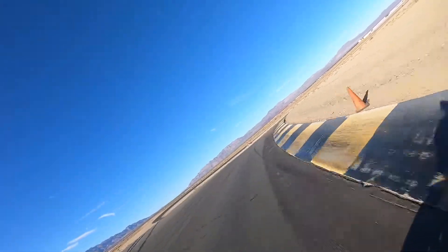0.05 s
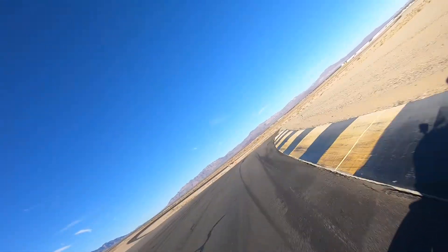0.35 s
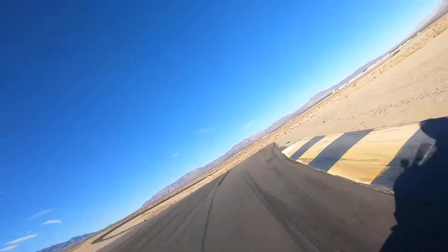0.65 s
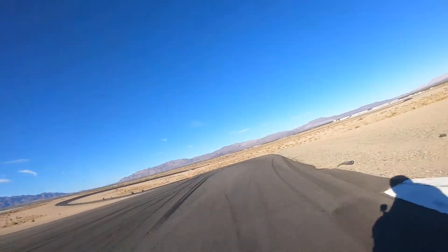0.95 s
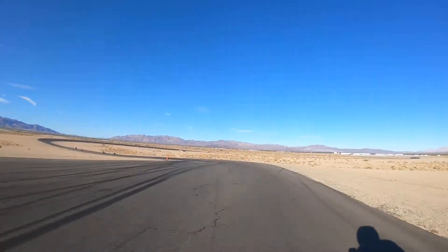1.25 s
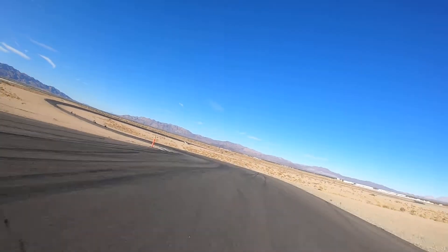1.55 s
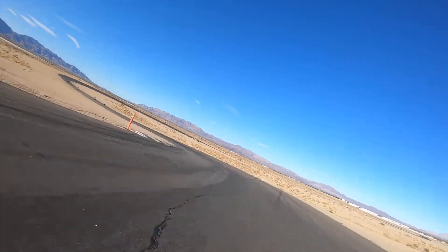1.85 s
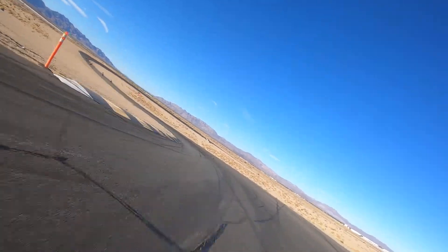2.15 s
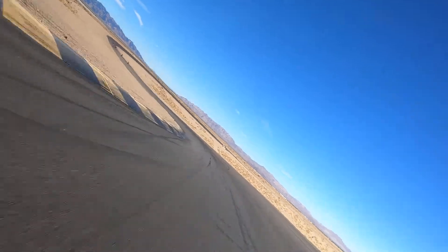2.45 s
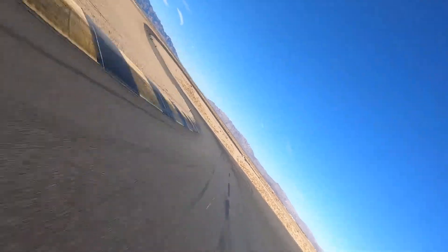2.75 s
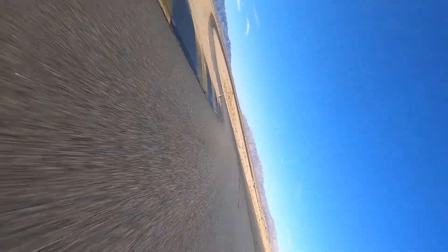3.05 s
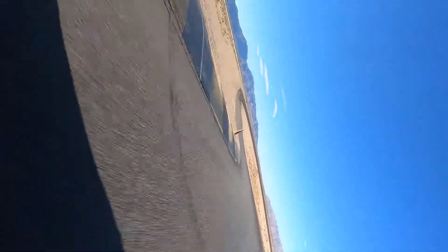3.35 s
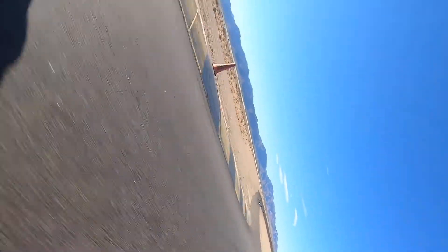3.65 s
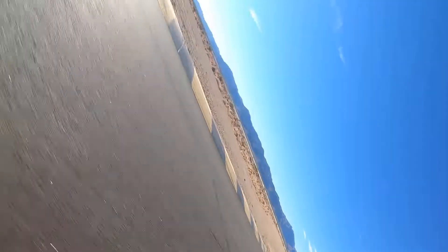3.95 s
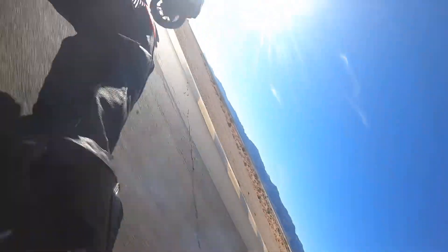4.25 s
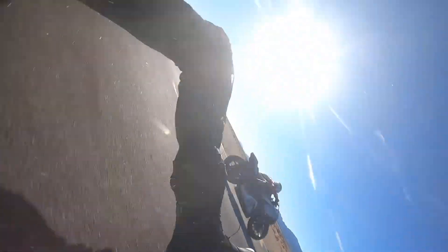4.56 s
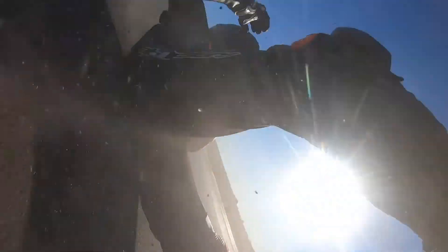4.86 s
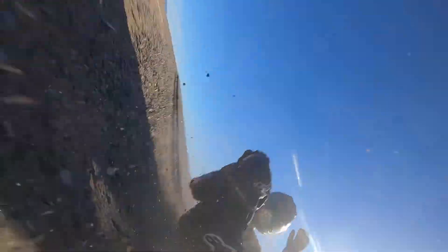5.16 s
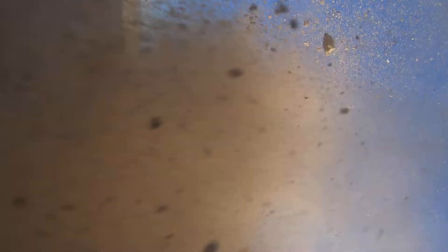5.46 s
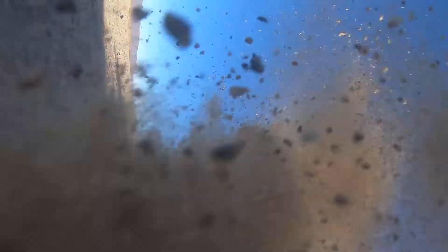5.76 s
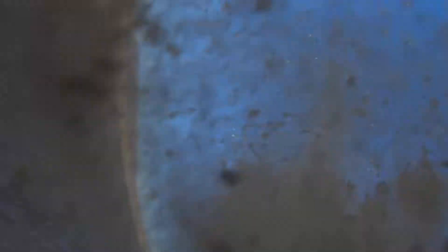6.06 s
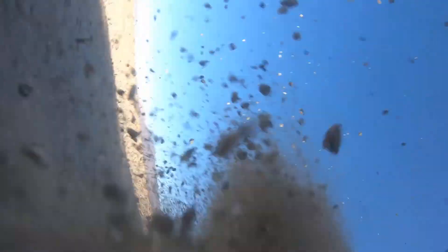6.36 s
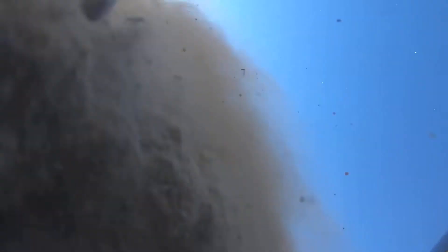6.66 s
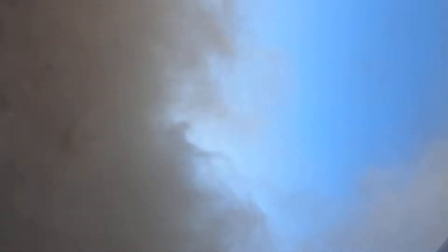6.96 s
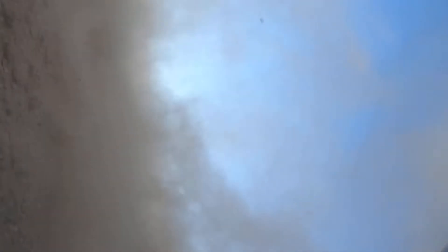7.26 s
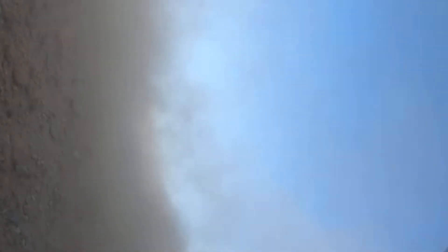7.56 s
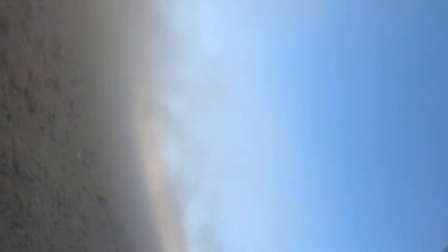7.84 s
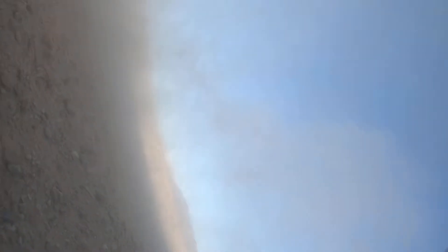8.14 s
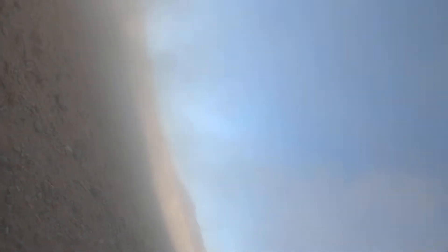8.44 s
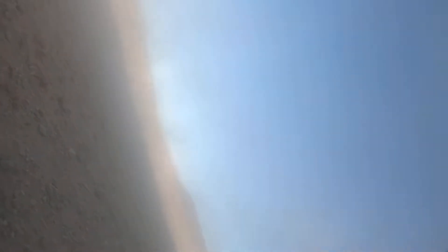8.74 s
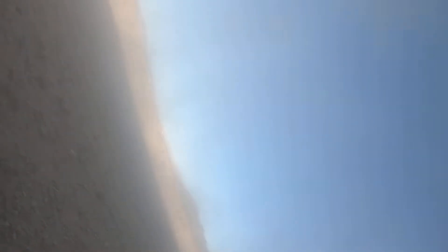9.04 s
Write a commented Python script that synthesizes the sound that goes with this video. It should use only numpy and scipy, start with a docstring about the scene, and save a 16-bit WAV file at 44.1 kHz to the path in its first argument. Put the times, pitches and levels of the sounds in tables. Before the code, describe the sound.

A motorcycle rounds a racetrack bend, heard from a microphone on its body, with a droning exhaust and rumbling wind. The engine revs up as the bike falls, then runs down while metal screeches and plastic grinds along the asphalt. The bike bounces through gravel with crunches, thumps and stones cracking close by, and finally lies idling with a lumpy, rattling beat.

```python
"""A motorcycle, heard from a camera on its body, rounds a bend: the exhaust drones and wind rumbles.
The engine revs up as the tyre lets go, and the bike falls. Metal screeches and plastic grinds along the
asphalt, the bodywork knocks and the frame groans while the engine runs down. Then the bike ploughs and
bounces through gravel, and flying stones crack against the camera housing.
At last it rests on its side and keeps idling with a lumpy, rattling beat."""
import sys
import numpy as np
from scipy import signal
from scipy.fft import irfft
from scipy.io import wavfile
from scipy.ndimage import uniform_filter1d, minimum_filter1d

SR = 44100
rng = np.random.default_rng(int(sys.argv[2]) if len(sys.argv) > 2 else 0)


def transcribe(u):
    """Save the signal u as a 16-bit wav file named by the first command-line argument.

    u: samples, shape (n,) or (channels, n), limited to [-1, 1]; the rate is SR.
    q: integer samples, one column per channel.
    """
    v = np.clip(np.atleast_2d(u).T, -1, 1)
    q = np.round(v * 32767).astype(np.int16)
    wavfile.write(sys.argv[1], SR, q)


N = 405719
T = np.arange(N) / SR

# Levels are relative. An "order" is a tone at a multiple of the engine's speed.
# A "colour" says how strong a sound is from low to high pitch.
# crank turns per second through the bend, the wheelspin and the run-down: t/s, f/Hz
CRANK_SPEED = [(0.1, 54.6), (0.55, 54.6), (0.94, 52.1), (1.26, 51.2), (1.62, 52.1), (2.85, 62.9),
               (2.97, 66.5), (3.1, 65.2), (3.42, 87.3), (3.57, 72.6), (3.86, 61.2), (3.97, 60.5),
               (4.1, 58.0), (4.26, 53.9), (4.51, 45.7), (4.72, 41.4)]
# strong exhaust orders: multiple of the crank speed, level/dB, change with the throttle shut/dB
MAIN_ORDERS = [(2, 1, -3.5), (3, -4.5, -3.5), (4, 1.5, -2)]
# a strong order swells as it crosses a resonance of the exhaust pipe: f/Hz, level/dB
PIPE_COLOUR = [(82, -13), (102, -19), (110, -12), (124, -16), (135, -14), (155, -12.5), (178, -7),
               (206, -10.5), (222, -15.5), (255, -17), (310, -23), (350, -27.5)]
# weak exhaust orders: multiple of the crank speed, level/dB against the mean of the strong ones
WEAK_ORDERS = [(1, -35), (2.5, -22), (5, -21), (6, -17.5), (7, -21), (9, -15), (10, -17.5), (11, -12.5)]
# uneven beats of the four cylinders: place in the engine cycle (0-1), level/dB
CYLINDER_BEATS = [(.9, -1), (.02, -2), (.22, -6), (.43, 0)]
# clatter of gears and valves while riding: t/s, level/dB
CLATTER_LEVEL = [(0, -22), (1.2, -25), (2.85, -22), (3.3, -21.5), (4.3, -20), (5.1, -22.5)]
# colour of that clatter: f/Hz, level/dB
ENGINE_COLOUR = [(252, -29), (420, -14), (680, -10.5), (1000, -3), (1350, 1.5), (2050, 2), (2400, -13.5),
                 (2900, -18.5), (3250, -15.5), (3650, -29), (4000, -22), (5500, -39.5), (8200, -48.5),
                 (11000, -56), (15000, -88.5)]
# ringing of the engine case: f/Hz, width/Hz
CASE_RING = [(3270, 27), (4000, 190)]
# rumble of the wind and the shaking camera mount: f/Hz, level/dB
RUMBLE_COLOUR = [(15, -12.5), (35, -1), (70, -1), (120, -0.5), (220, 1.5), (320, -10), (400, -26.5),
                 (700, -50), (4000, -96.5)]
# bodywork on asphalt: start t/s, length/s, screech level/dB, grinding level/dB
ROAD_SCRAPES = [(3.012, 0.92, -20, -31), (4.212, .82, -24, -28), (4.921, 0.088, -39, -21.5)]
# screech of sliding metal: f/Hz, width/Hz, level/dB
METAL_SCREECH = [(1865, 129, 5), (1717, 200, -3), (3960, 670, -22.5), (8100, 8900, -52.5)]
# grinding of the plastic panels: f/Hz, level/dB
PLASTIC_COLOUR = [(228, -21), (380, -17.5), (600, -15.5), (1000, -2.5), (1900, 1.5), (2400, -26.5),
                  (4200, -30.5), (6000, -52), (9000, -71.5), (15000, -71)]
# ticking of grit and small stones: f/Hz, level/dB
TICK_COLOUR = [(600, -53), (1600, -13), (2700, 2), (3500, 0.5), (5000, -5), (6500, -12), (8000, -10.5),
               (10500, -21), (13000, -28.5), (15500, -38)]
# blows on the frame and panels: t/s, clack level/dB, thud level/dB
BODY_KNOCKS = [(3.135, -18, -6), (5.189, -11.5, -33), (5.242, -22, -10), (5.681, -20, -10.5),
               (5.889, -23, -20), (5.946, -16.5, -39), (6.018, -25, -22), (6.27, -16.5, -8.5),
               (6.395, -23, -30), (6.518, -17, -18), (6.56, -18.5, -10.5), (7.23, -40, -5.5),
               (8.392, -16.5, -8), (8.428, -12, -10)]
# low tones of a thud: f/Hz, level/dB, time to fade by 60 dB/s
THUD_TONES = [(157, -1, 0.095), (226.6, 7, 0.07), (279, -9, 0.089)]
# panels, whether knocked or rattling at idle: f/Hz, level/dB
PANEL_COLOUR = [(240, -31.5), (400, -17.5), (630, -20.5), (770, -2), (950, -14), (1300, 2), (1700, 4.5),
                (2050, -4.5), (2300, -17.5), (2700, -21), (3100, -28), (4800, -36), (5400, -56),
                (8000, -69), (14000, -92)]
# the frame gouges the ground: middle t/s, half length/s, level/dB
FRAME_GOUGES = [(4.544, 0.083, -28.5), (4.716, 0.08, -24), (4.858, 0.029, -28), (5.03, 0.032, -31.5),
                (5.32, 0.067, -26), (5.463, 0.05, -28), (5.757, 0.06, -29)]
# hollow ringing of the frame: f/Hz, width/Hz
FRAME_RING = [(380, 89), (590, 133), (800, 400)]
# engine cycles per second at idle: t/s, f/Hz
IDLE_RATE = [(6.85, 12.9), (6.95, 12.2), (7.25, 12.3), (7.4, 12.6), (8.2, 12.6), (8.35, 12.35),
             (8.9, 12.35), (9.03, 11.9), (9.2, 12.9)]
# exhaust orders at idle: multiple of the cycle rate, level/dB
BOOM_ORDERS = [(3, -14.5), (5, -25.5), (6, -25), (7, -2), (8, -11.5), (11, -16), (12, -15.5), (15, -16.5),
               (16, -13), (24, -22.5), (25, -24)]
# engine metal ringing at idle: f/Hz, width/Hz, level/dB
METAL_RING = [(2660, 180, -22.5), (5820, 360, -48), (7640, 200, -52.5)]
# digs into the gravel between bounces: start t/s, length/s, crunch, thump and spray level/dB
GRAVEL_DIGS = [(4.966, 0.17, -41, -17.5, -64), (5.212, 0.14, -19, -12.5, -34),
               (5.383, 0.086, -23, -13, -28.5), (5.686, 0.15, -21.5, -14.5, -36),
               (6.008, 0.18, -20, -13.5, -43), (6.273, 0.25, -22, -13.5, -41.5),
               (6.569, 0.21, -27, -14.5, -51), (6.803, 0.29, -41, -25.5, -62)]
# stones crunching under the bike: f/Hz, level/dB
GRAVEL_COLOUR = [(250, -20), (420, -8.5), (750, -1.5), (1400, 8.5), (1950, 9), (2400, -12), (3500, -16),
                 (6000, -39.5), (15000, -89.5)]
# the frame thumping through gravel: f/Hz, level/dB
JOLT_COLOUR = [(30, -1.5), (60, -5.5), (90, 3.5), (170, -1), (280, -3.5), (370, -26), (700, -61),
               (4000, -84)]
# the largest stones that hit the camera housing: t/s, level/dB
STONE_HITS = [(5.256, -15.5), (5.285, -20), (5.504, -33), (5.5343, -15), (5.571, -21), (5.62, -27),
              (5.725, -18.5), (5.8492, -21), (5.8648, -20), (6.032, -18), (6.0777, -15), (6.318, -27),
              (6.4, -18.5), (6.483, -32), (6.601, -17), (8.5562, -27), (8.5747, -32)]
# ringing of the camera housing: f/Hz, level/dB, time to fade by 60 dB/s
HOUSING_TONES = [(3330, -18, 0.023), (5180, -15, 0.028), (7450, -20, 0.052)]

FALL_S, OFF_TRACK_S = 2.56, 5.45  # the bike starts to go down; it has left the track
IDLE_FROM_S, IDLE_BLEND_S = 4.95, 0.6  # the falling engine note settles into the idle
DIG_ATTACK_S = 0.036


def amp(db):
    """Turns decibels into a gain to multiply by."""
    return 10 ** (np.asarray(db) / 20)


def unit(x):
    """Scales a signal to an average strength (rms) of 1."""
    return x / np.sqrt(np.mean(x ** 2) + 1e-20)


def curve(rows):
    """Joins (time, value) points with straight lines."""
    return np.interp(T, *np.transpose(rows))


def ramp(start, length):
    """0 before the start, then rising evenly to 1."""
    return np.clip((T - start) / length, 0, 1)


def contact(start, length, attack_s, release_s):
    """A loudness shape that rises, holds at 1 and dies away after its length."""
    return ramp(start, attack_s) * np.exp(-np.maximum(T - start - length, 0) / release_s)


def add(mix, s, sound):
    """Mixes a sound in at time s."""
    part = mix[round(s * SR):][:len(sound)]
    part += sound[:len(part)]


def wander(hz):
    """A smooth random wobble of strength 1, up to about hz."""
    steps = rng.standard_normal(N // 32 + 2)
    smooth = signal.sosfilt(signal.butter(2, hz, fs=SR / 32, output="sos"), steps)
    return unit(np.interp(np.arange(N), np.arange(len(steps)) * 32, smooth))


def grains(per_s, spread_db):
    """Random clicks, mostly small and a few large."""
    size = amp(spread_db * np.minimum(rng.exponential(1, N), 4))
    return unit(size * rng.choice([-1, 1], N) * (rng.random(N) < per_s / SR))


def shaped(x, points, size=4096):
    """Filters a sound to the given colour; white noise keeps its level."""
    hz, db = np.transpose(points)
    bin_hz = abs(np.fft.fftfreq(size, 1 / SR))
    log_gain = np.log(amp(np.interp(np.log(bin_hz + 1), np.log(hz), db)))
    response = np.exp(np.conj(signal.hilbert(log_gain)))  # rings after a hit, never before it
    taps = np.fft.ifft(response).real[:size // 2]
    return signal.oaconvolve(x, taps / np.linalg.norm(taps))[:N]


def colour(x, points):
    """Gives a sound a colour and a strength of 1."""
    return unit(shaped(x, points))


def resonate(x, hz, width):
    """Makes a sound ring around one pitch, at a strength of 1."""
    b, a = signal.iirpeak(hz, hz / width, SR)
    return unit(signal.lfilter(b, a, signal.lfilter(b, a, x)))


def repeating(turns, size=800):
    """A spinning part whirrs because the same roughness comes round on every turn."""
    one_turn = irfft(np.exp(2j * np.pi * rng.random(size // 2 + 1)))
    return unit(np.interp(turns % 1, np.arange(size) / size, one_turn))


def shaking(cycles, ring, between):
    """The loudness shape of a rattle: each cylinder's beat shakes loose a burst."""
    bursts = sum(amp(db) * np.exp(-((cycles - place) % 1) / ring) for place, db in CYLINDER_BEATS)
    return unit(between + uniform_filter1d(bursts, size=130))


def order(k, turns):
    """A tone at k times the crank speed; the pipe delays each differently, smearing pulses into a drone."""
    return np.sqrt(2) * np.sin(2 * np.pi * (k * turns + k ** 2 / 5))


def pipe_db(k, crank_hz, shut_db, null_hz=237, null_width_hz=10):
    """How the pipe's resonances and the throttle change the level of a strong order."""
    hz = k * crank_hz
    shut = ramp(3.55, 0.24)  # the throttle closes
    # under load the firing order, the fourth, cancels itself around one pitch
    null_db = -16 * np.exp(-((hz - null_hz) / null_width_hz) ** 2) * (k == 4)
    drop_db = -8 * ramp(4.73, 0.071)  # the exhaust drone drops quickly at 4.7 s, under the scraping
    return np.interp(hz, *np.transpose(PIPE_COLOUR)) + (1 - shut) * null_db + shut * shut_db + drop_db


def exhaust(crank_hz, turns, waver, upright, muffle_db=14):
    """Pulses of gas leave the pipe as a drone of three strong tones and several weak ones."""
    strong = [(k, amp(db + pipe_db(k, crank_hz, shut_db))) for k, db, shut_db in MAIN_ORDERS]
    drone = sum(gain * order(k, turns) * (1 + waver * wander(28)) for k, gain in strong)
    load = upright * sum(gain for _, gain in strong) / len(strong)
    for k, db in WEAK_ORDERS:
        silencer_db = np.interp(k * crank_hz, [335, 400], [0, muffle_db])  # only low tones get out freely
        drone += load * amp(db - silencer_db) * order(k, turns) * (1 + 2 * waver * wander(11))
    return drone


def clatter(turns, upright, gear_teeth=22):
    """Shafts whirr, valves rattle, the engine case rings and the gear teeth whine."""
    whirr = repeating(turns) + .5 * repeating(turns / 2, size=1600)  # crankshaft and camshafts
    rattle = shaking(turns / 2, ring=.12, between=1) * rng.standard_normal(N)
    drive = upright * whirr + rattle
    case_ring = unit(sum(resonate(drive, hz, width) for hz, width in CASE_RING))
    whine_db = -15 + 5 * ramp(1.8, .3)  # louder as the bike pulls out of the bend
    whine = order(gear_teeth, turns) * amp(whine_db + 2.5 * wander(8))
    tones = upright * (amp(-22) * case_ring + whine)
    return (colour(drive, ENGINE_COLOUR) + tones) * amp(curve(CLATTER_LEVEL))


def riding_engine(exhaust_db=-2):
    """Exhaust and clatter follow the crank speed, then fade as the idle takes over."""
    crank_hz = curve(CRANK_SPEED)
    waver = np.interp(T, [3.2, 3.8], [.1, .28])  # the note breaks up once the bike is scraping
    upright = np.interp(T, [2.9, 3.2], [1, .35])  # the clean tones sink once the bike is down
    turns = np.cumsum(crank_hz * (1 + 0.011 * waver * wander(15))) / SR
    running = ramp(0, 0.005) - ramp(IDLE_FROM_S, IDLE_BLEND_S)
    return running * (amp(exhaust_db) * exhaust(crank_hz, turns, waver, upright) + clatter(turns, upright))


def buffeting(riding_db=-25, sliding_db=-18.5, resting_db=-26.5, dig_db=-4):
    """Wind and the shaking mount make a lumpy rumble, strongest while the bike slides and digs in."""
    stage_db = np.interp(T, [FALL_S, FALL_S + .3, OFF_TRACK_S, OFF_TRACK_S + 0.13],
                         [riding_db, sliding_db, sliding_db, resting_db])
    _, thump, _ = digging()
    level = np.hypot(amp(stage_db), amp(dig_db) * thump)
    return colour(rng.standard_normal(N), RUMBLE_COLOUR) * level * amp(1.7 * wander(28))


def asphalt(ticks_db=-29):
    """The rough road catches on metal and plastic, which chatter as they slide; loose grit ticks."""
    screeching, grinding = sum(np.outer(amp(levels_db), contact(s, length, 0.073, release_s=0.095))
                               for s, length, *levels_db in ROAD_SCRAPES)
    chatter = wander(24)
    catches = grains(per_s=3000, spread_db=2.5)
    screech = unit(sum(amp(db) * resonate(catches, hz, width) for hz, width, db in METAL_SCREECH))
    grind = colour(grains(per_s=3000, spread_db=1), PLASTIC_COLOUR)
    grind += amp(ticks_db) * colour(grains(per_s=400, spread_db=5), TICK_COLOUR)
    return screech * screeching * amp(1.9 * chatter) + grind * grinding * amp(1.7 * chatter)


def knocks(clack_s=0.0038, thud_rise_s=0.01):
    """Blows on the bodywork: a plastic clack over a short low thud."""
    clacks, thuds, t = np.zeros(N), np.zeros(N), T[:SR // 5]
    for s, clack_db, thud_db in BODY_KNOCKS:
        add(clacks, s, amp(clack_db) * t / clack_s * np.exp(1 - t / clack_s))
        thud = sum(amp(db - 60 * t / fade_s) * np.sin(2 * np.pi * hz * rng.uniform(0.865, 1.36) * t)
                   for hz, db, fade_s in THUD_TONES)
        add(thuds, s, amp(thud_db) * thud * (1 - np.exp(-t / thud_rise_s)))
    return shaped(clacks * rng.standard_normal(N), PANEL_COLOUR) + thuds


def gouges():
    """Where the frame digs in hard, it judders with a hollow groan."""
    pressure = sum(amp(db) * np.exp(-((T - s) / half) ** 4) for s, half, db in FRAME_GOUGES)
    judder = rng.standard_normal(N)
    return pressure * unit(sum(resonate(judder, hz, width) for hz, width in FRAME_RING))


def idling_engine(boom_db=-13.5, rattle_db=-24.5, recover_from_s=7.066, recover_s=1):
    """A slow lumpy beat: one exhaust order booms, and the boom rattles the bodywork."""
    cycles = np.cumsum(curve(IDLE_RATE)) / SR
    cycles -= np.interp(7.7, T, cycles)  # a cycle starts at 7.7 s
    # the crash chokes the idle, then it picks up again
    choke_db = -11.5 * np.exp(-np.maximum(T - recover_from_s, 0) / recover_s)
    boom = np.zeros(N)
    for k, db in BOOM_ORDERS:
        # orders far from the booming seventh lag behind it and change most from cycle to cycle
        lag = (k - 7) ** 2 / 4 + 0.2 * abs(k - 7) * wander(4)
        boom += amp(db) * np.cos(2 * np.pi * k * (cycles - .1) - lag)
    shake = shaking(cycles, ring=.1, between=.25) * (1 + np.tanh(boom) ** 2) * rng.standard_normal(N)
    metal = sum(amp(db) * resonate(shake, hz, width) for hz, width, db in METAL_RING)
    rattle = colour(shake, PANEL_COLOUR) + metal
    rattle *= amp(rattle_db + 1.62 * choke_db)  # the rattle grows back faster than the boom
    stumble = amp(np.interp(T, [8.44, 8.455, 8.48, 8.50], [4, -6, -2, 2.5]))  # the engine misses a beat
    running = ramp(IDLE_FROM_S, IDLE_BLEND_S)
    return running * stumble * (np.sqrt(2) * amp(boom_db + choke_db) * boom + rattle)


def digging():
    """Three loudness shapes (crunch, thump, spray) that swell each time the bike digs into the gravel."""
    return sum(np.outer(amp(levels_db), contact(s, length, DIG_ATTACK_S, release_s=0.029))
               for s, length, *levels_db in GRAVEL_DIGS)


def gravel(hail_from_s=5.17, hail_db=-39, fade_db_per_s=5.5, patter_db=9):
    """At each dig, stones crunch, the frame thumps and grit sprays; grit patters down in between."""
    crunch, thump, spray = digging()
    # thrown grit keeps raining on the bike, fading as it slows
    hail = contact(hail_from_s, 1.4, DIG_ATTACK_S, release_s=0.12)
    hail *= amp(hail_db - fade_db_per_s * (T - hail_from_s))
    clumps = wander(38)
    crushed = grains(per_s=4000, spread_db=2.5)
    jolts = grains(per_s=900, spread_db=1.5)
    grit = grains(per_s=1200, spread_db=7) + .6 * rng.standard_normal(N)
    sound = colour(crushed, GRAVEL_COLOUR) * np.hypot(crunch, hail * amp(patter_db)) * amp(3.2 * clumps)
    sound += colour(jolts, JOLT_COLOUR) * thump * amp(clumps)
    return sound + colour(grit, TICK_COLOUR) * np.hypot(spray, hail) * amp(2.5 * clumps)


def stones(level_db=3, crack_s=0.0025):
    """Stones crack against the camera housing and make it ring briefly."""
    cracks, rings, t = np.zeros(N), np.zeros(N), T[:SR // 16]
    for s, stone_db in STONE_HITS:
        add(cracks, s, amp(stone_db) * np.exp(-t / crack_s))
        for hz, db, fade_s in HOUSING_TONES:
            struck_hz = hz * rng.uniform(.8, 1.2)  # the pitch shifts with the spot that is struck
            add(rings, s, amp(stone_db + db - 60 * t / fade_s) * np.sin(2 * np.pi * struck_hz * t))
    return amp(level_db) * (.5 * shaped(cracks * rng.standard_normal(N), TICK_COLOUR) + rings)


def scene():
    """Adds up all the sounds at the one microphone."""
    bike = riding_engine() + idling_engine() + buffeting()
    crash = asphalt() + gouges() + gravel() + stones() + knocks()
    return (bike + crash)[None]


def record(dry):
    """A fast limiter turns down the loudest peaks; then the treble above 15500 Hz is cut."""
    gain = np.minimum(1, .92 / (abs(dry) + 1e-9))
    limited = dry * uniform_filter1d(minimum_filter1d(gain, size=301), size=301)
    lowpass = signal.firwin(511, 15500, window=("kaiser", 9), fs=SR)
    return signal.oaconvolve(limited, lowpass[None], "same")


dry = scene()
out = record(dry)
transcribe(out)
```